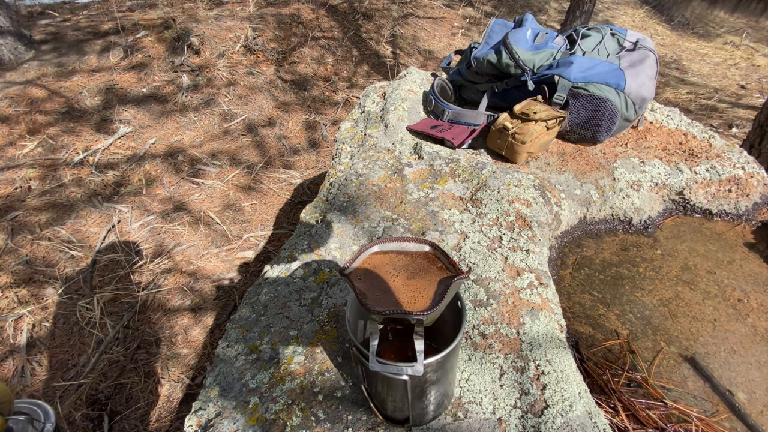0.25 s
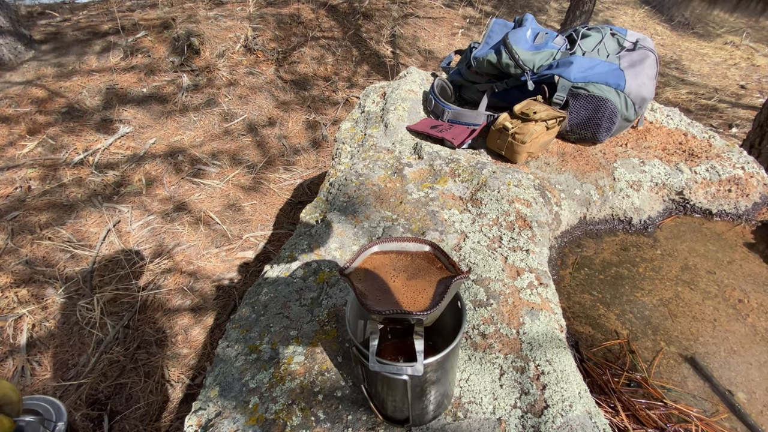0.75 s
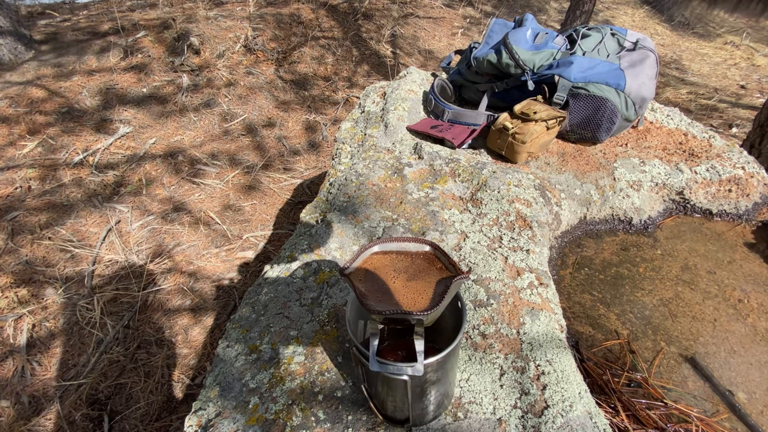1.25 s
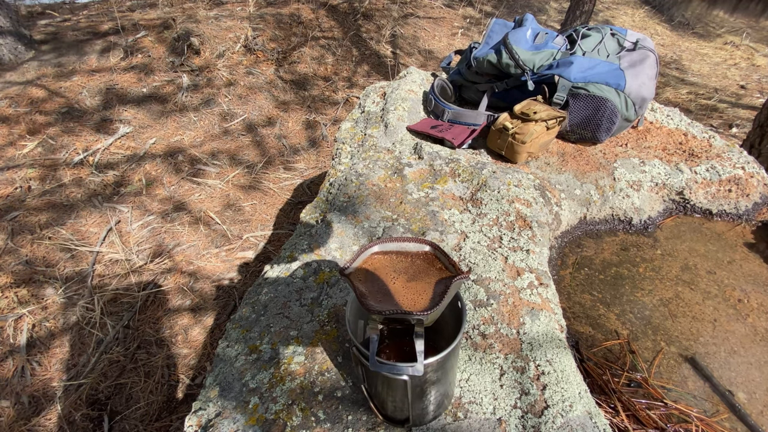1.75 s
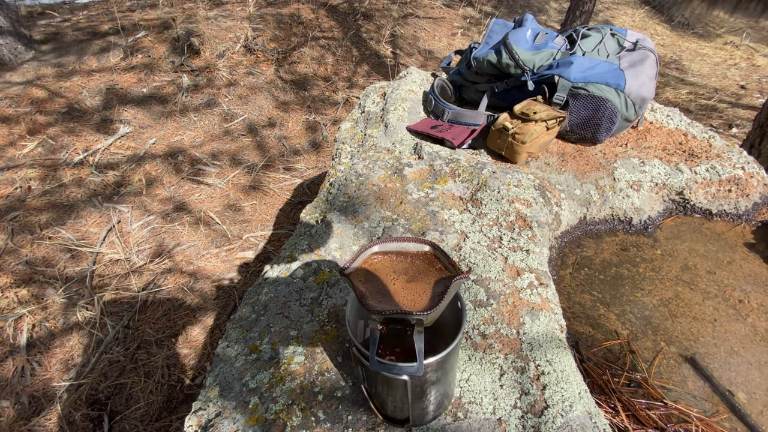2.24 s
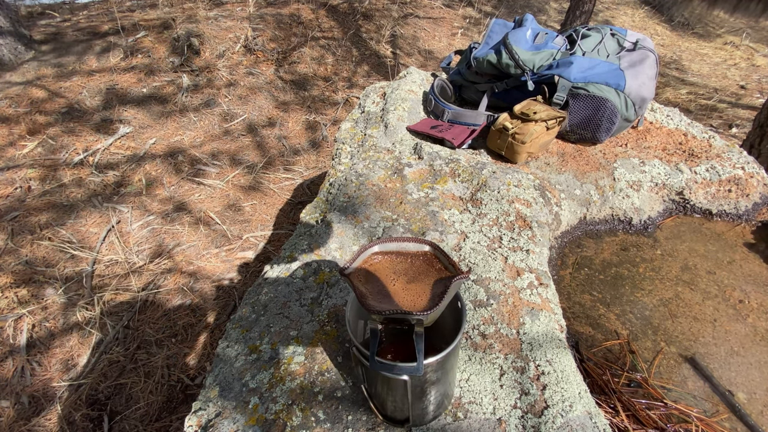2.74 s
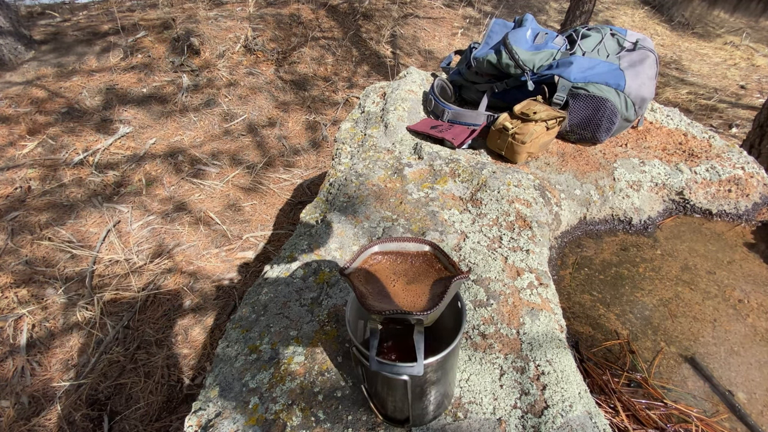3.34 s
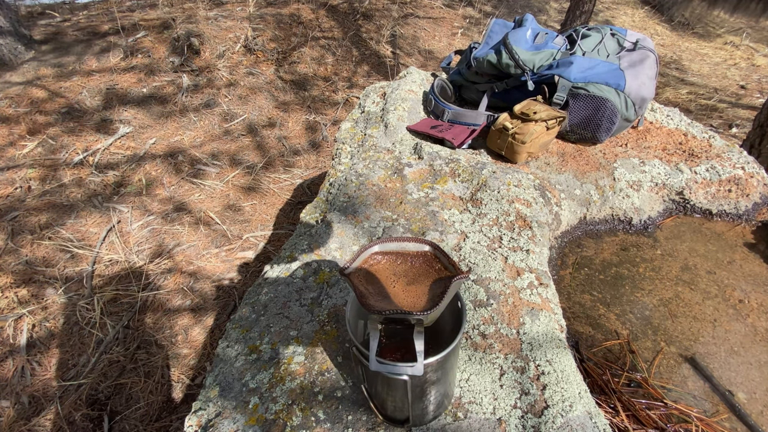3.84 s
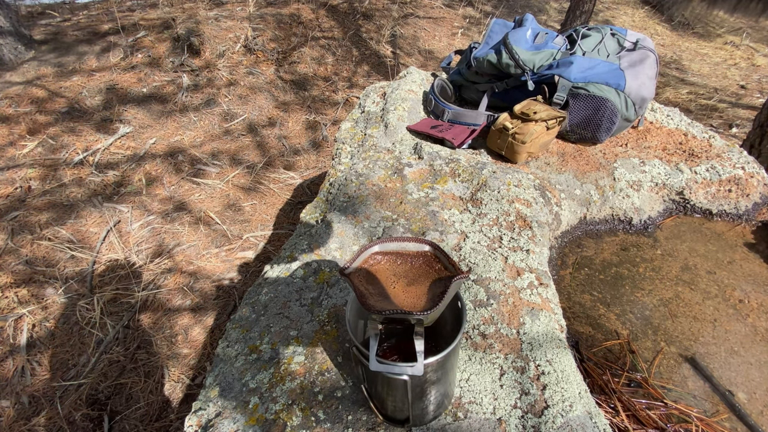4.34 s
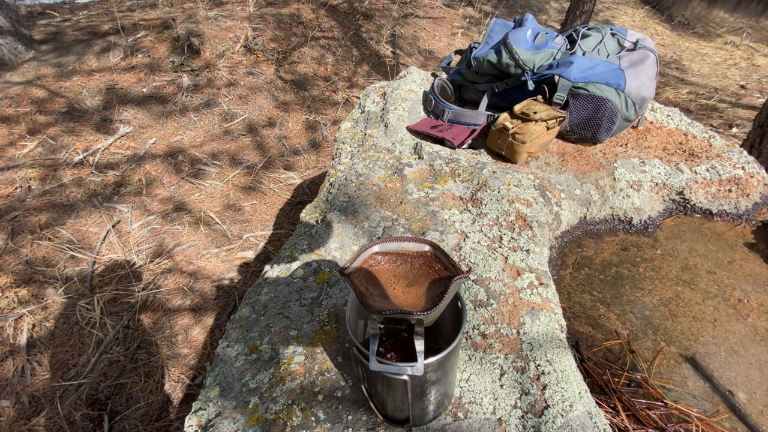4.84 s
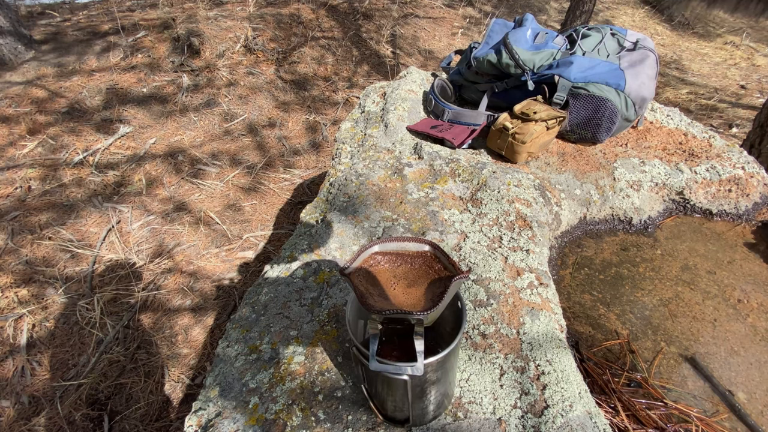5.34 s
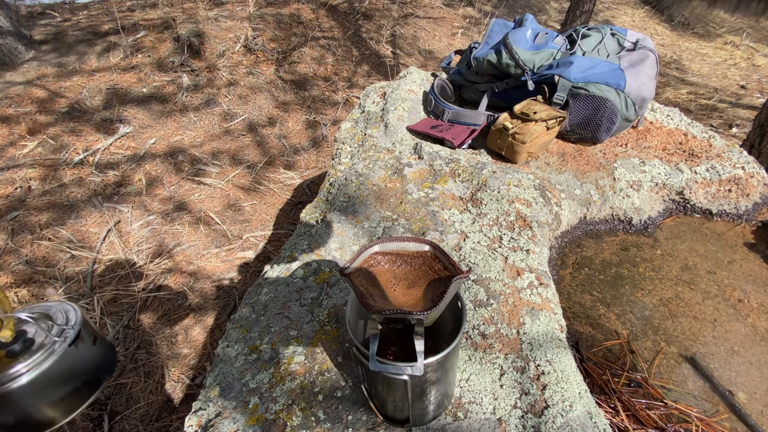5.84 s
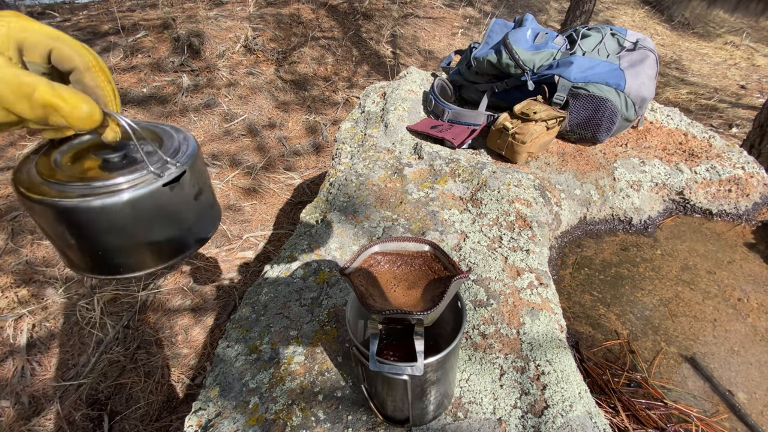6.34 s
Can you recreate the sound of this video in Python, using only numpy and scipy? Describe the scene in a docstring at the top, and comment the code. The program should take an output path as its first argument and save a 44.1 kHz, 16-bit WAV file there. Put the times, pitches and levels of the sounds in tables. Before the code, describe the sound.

Coffee drips from a wet filter into a steel cup, heard close up in open woodland. From 0 s, quick irregular plinks and smaller spattering droplets ring the metal briefly, while tiny high ticks and a fine crackle come from the wet grounds. Deep wind gusts buffet the microphone in uneven thumps until about 2.2 s. The wind then lulls, leaving the drops clear over a faint rush of trees and a weak, wavering engine hum far away. Around 4 s a second gust builds, strongest near 4.9 s, with fluttering puffs until about 5.6 s, then subsides, apart from a small low bump near 6.3 s. The dripping continues to the end at about 6.6 s, the small trickle and crackle slightly sparser and the cup's tones mostly a little lower as it fills.

```python
"""Coffee drips from a wet filter into a steel cup that stands on a rock in open woodland.
From the start a gust rumbles on the microphone, over a faint rush of trees and a far engine drone.
Drops plink all along and ring the cup, whose tones sink as it fills; bubbles in the wet grounds tick.
The wind lulls after two seconds and a second long gust follows after about four. Wind and trees are
shaped noise, the engine is one wavering tone, and drops and ticks are built from short bubble tones."""
import sys
import numpy as np
from scipy import signal
from scipy.fft import rfft, irfft
from scipy.io import wavfile

SR = 44100
rng = np.random.default_rng(int(sys.argv[2]) if len(sys.argv) > 2 else 0)


def to_wav(s):
    """Save 16-bit WAV."""
    ch = np.atleast_2d(s).T  # columns
    pcm = np.round(np.clip(ch, -1, 1) * 32767)  # PCM
    wavfile.write(sys.argv[1], SR, pcm.astype(np.int16))


N = 290178
TIME = np.arange(N) / SR
GUST_DB = -30  # wind force of a typical gust
EDGE_HZ = 15850  # upper edge of the recorder's band

# force of the wind on the microphone, two long gusts with a lull between: start_s, force_db
WIND_FORCE = [(0.08, -40), (.42, -41), (.62, -25.5), (.88, -41.5), (1.03, -35.5), (1.18, -28), (1.3, -26.5),
              (1.44, -31.5), (1.56, -33), (1.85, -33), (1.96, -29.5), (2.22, -58), (2.32, -47), (2.5, -61),
              (2.8, -62), (3.3, -56), (3.87, -48), (4.08, -41.5), (4.56, -34.5), (4.85, -25.5), (5.03, -31),
              (5.18, -35), (5.63, -44.5), (5.74, -54), (6.1, -62), (6.32, -38.5), (6.45, -50.5)]
# single puffs that hit the microphone inside the gusts: middle_s, half_length_s, extra_force_db
PUFFS = [(0.15, 0.069, 16), (0.42, 0.035, 11), (0.562, 0.032, 2.5), (1.409, 0.12, 15), (1.67, 0.015, -1),
         (1.78, 0.027, 14), (1.962, .015, 5), (4.049, 0.015, 20), (4.368, 0.065, 13), (4.731, .025, 9.5),
         (4.905, 0.04, 8.5), (5.232, .015, 13), (5.508, 0.032, 17)]
# slow swings of air pressure, which start before a gust and outlast it: start_s, level_db
SWAY_LEVEL = [(0, -0.5), (.9, -10.5), (1.7, -3), (2.2, -9), (2.6, -27), (3.2, -11.5), (3.7, -29.5),
              (4.3, -8.5), (4.85, -3.5), (5.6, -8.5), (5.9, -21), (6.58, -22)]
# noise spectra of the wind, from the slow swings to the smallest eddies; only the shape counts:
# pitch_hz, strength_db (per Hz)
SWAY_SPECTRUM = [(.3, -31), (1.2, 8), (3, 6), (5.5, -5.5), (8, -3), (13, -13.5), (19, -8), (26, -73.5),
                 (200, -170)]
BUFFET_SPECTRUM = [(10, -54), (18, -27), (25, 7.5), (35, -6), (50, -10), (70, -26), (120, -54.5),
                   (900, -150)]
FLUTTER_SPECTRUM = [(35, -30.5), (55, -13), (70, 1), (90, -6.5), (130, -15), (190, -37.5), (280, -29),
                    (600, -67.5), (4000, -130)]
EDDY_SPECTRUM = [(60, -22.5), (120, 4), (175, 2), (230, -9), (350, -22), (700, -57.5), (4000, -120)]
# noise spectrum of the air in the trees; only the shape counts: pitch_hz, strength_db (per Hz)
TREE_SPECTRUM = [(30, 3.5), (120, 7), (200, 0.5), (350, -1), (600, 3), (850, -1.5), (1150, -2.5),
                 (1600, -10.5), (2400, -14.5), (3400, -21.5), (5000, -30.5), (9000, -34.5), (15500, -37.5)]
# the far engine, before its waver: start_s, pitch_hz, level_db
ENGINE = [(0, 80, -69), (2, 88.3, -60.5), (2.5, 89.2, -59.5), (3.7, 92.4, -55.5), (4.2, 95.5, -53),
          (5.4, 98.8, -58.5), (6.58, 99.4, -56.5)]
# the clearest drops landing in the cup, before cup and rim act on them:
# start_s, level_db, bubble_pitch_hz, swell_cycles (to the bubble's peak), cup_answer_db (before a shared boost)
DRIPS = [(.0226, -51, 1310, 0.43, -17), (0.0553, -52, 2760, 0.55, 3), (0.0982, -57.5, 1940, 0.14, 14),
         (0.1364, -53, 3020, 0.67, 13), (0.155, -55, 2780, 1.5, -3), (0.1682, -43.5, 3160, 0.62, -9),
         (0.3666, -56, 2300, 0.18, 6), (0.417, -66, 2100, 0.46, 23), (0.4423, -41, 2380, 1.1, 0),
         (0.4573, -49.5, 1640, 0.36, 5), (.539, -54.5, 1530, 0.34, 12.5), (0.604, -59, 1450, 0.25, 17),
         (.653, -61, 2780, 0.22, 7),  (.72, -58, 3060, 1.5, 13), (0.7272, -45.5, 2710, 1.2, -21),
         (0.82, -54, 2500, 0.65, -5), (0.8334, -52.5, 2010, 0.13, -1), (0.841, -54.5, 1720, 0.074, 5),
         (0.8819, -47.5, 2740, 2.2, -20), (0.9268, -59.5, 2870, 0.97, 13.5), (0.985, -59, 1790, 0.63, -1.5),
         (1.0292, -49, 3700, 3.3, 2.5), (1.05, -45.5, 2740, 0.76, 1), (1.1867, -46, 2000, 1.3, -13),
         (1.2094, -47, 1960, 0.44, 1.5), (1.2302, -50, 1430, 0.32, 12.5), (1.33, -54.5, 1720, 0.41, -3),
         (1.41, -53.5, 2500, 0.62, 1), (1.4965, -49, 2440, 0.63, 2), (1.557, -54, 2300, 0.66, 2),
         (1.5691, -48, 2500, 0.31, -9), (1.6247, -50, 2520, 0.73, 2.5), (1.9046, -43, 700, 0.15, 2),
         (1.932, -58, 2316, 0.16, 15.5), (2.0166, -52, 1990, 0.17, -1), (2.059, -53.5, 1730, 0.28, -3),
         (2.1751, -47.5, 960, 0.14, 10), (2.2088, -50.5, 1380, 0.15, 4), (2.245, -53.5, 1750, 0.52, 4),
         (2.3355, -44.5, 1600, 0.38, 6), (2.4562, -48.5, 1540, 0.31, 0), (2.707, -46, 2040, 0.41, 3),
         (2.7285, -54.5, 1580, 0.47, 14), (2.7695, -46, 2270, 1.1, -3), (2.812, -60, 2110, 0.33, 10),
         (2.8623, -46.5, 1780, 0.33, -2), (2.893, -52, 1700, 0.35, -8), (2.928, -50.5, 1410, 1, 1),
         (2.964, -57, 1680, 0.38, 7), (3.0401, -56, 3400, 0.24, 8), (3.05, -54.5, 1660, 1, 9),
         (3.2117, -51.5, 2420, 0.24, -2), (3.248, -53, 1352, 0.063, 10.5), (3.285, -57, 2000, 0.77, -6),
         (3.3145, -56, 3240, 0.28, 10.5), (3.4108, -42.5, 2340, 0.88, 10.5), (3.504, -60, 2704, 0.33, 5),
         (3.557, -55, 1550, 0.28, 5), (3.7323, -42.5, 618, 1.26, -18), (3.886, -72, 2600, 0.34, 15),
         (3.916, -60.5, 1870, 0.47, 6), (4.0474, -47.5, 1150, 0.19, 1), (4.0801, -54, 2140, 0.24, 1),
         (4.1066, -61, 2380, 0.15, 15), (4.302, -52, 1040, 0.16, 9.5), (4.313, -47, 1274, 0.053, -1.5),
         (4.4608, -51, 1850, 0.39, 5.5), (4.586, -53.5, 2450, 0.5, 0), (4.6116, -45, 1760, 0.49, 2),
         (4.648, -49, 1940, 2.7, 1), (4.7677, -58, 1360, 0.39, 12), (4.8932, -55, 2230, 0.12, 3),
         (4.912, -49.5, 2000, 1.1, -14), (4.974, -59.5, 1520, 0.35, 11), (5.0643, -57.5, 895, 0.07, 16),
         (5.1, -59, 1990, 0.39, 11.5), (5.2215, -48, 2100, 1.1, 12), (5.249, -56.5, 1625, 0.49, 10),
         (5.292, -61.5, 3620, 0.35, -11), (5.3431, -46.5, 1900, 0.38, 3), (5.3708, -52, 1190, 0.16, 9.5),
         (5.401, -69, 1860, 0.52, 19), (5.444, -60, 1200, 0.15, 15.5), (5.5, -57, 2020, 0.11, 4.5),
         (5.636, -62, 1580, 0.36, -2), (5.7012, -42, 1626, 0.32, -0.5), (5.8052, -50.5, 3500, 0.54, -6),
         (5.828, -52, 2240, 1.6, -8), (5.846, -57.5, 2270, 1.2, -2), (5.996, -60.5, 2400, 0.3, 5),
         (6.057, -43, 1915, 0.61, -7), (6.113, -49.5, 2400, 0.078, -4.5), (6.176, -58, 1870, 2, 2.5),
         (6.257, -50.5, 1540, 0.2, 2), (6.421, -49.5, 2230, 0.36, 1.5)]
# the cup's own tones, before small random shifts:
# first_pitch_hz, fuller_pitch_hz, first_gain_db, fuller_gain_db, t60_s (time to fade by 60 dB)
CUP_TONES = [(590, 610, -3, -4, .06), (1270, 1085, 0, 2.5, .15), (1530, 1518, 3, -2, .09),
             (1890, 1750, -2, -6, .11), (2110, 1985, -2, 3, .1), (2350, 2330, -8, 13.5, .15),
             (2740, 2475, 11, 8, .15), (3560, 3320, 0, 6, .27), (3860, 3695, 10.5, 10.5, .18),
             (4820, 4340, 4, 6, .12), (5660, 5450, 3, 3, .1), (6120, 6200, 3, 3, .1),
             (7110, 6880, 3, 3, .1), (8170, 8380, 3, 3, .08)]
# what carries over the rim to the microphone: pitch_hz, gain_db
RIM = [(200, -22), (420, -13), (620, 4), (900, 1), (1500, 0.5), (2600, -1.5), (3250, -1.5), (3580, -3),
       (3800, -0.5), (4500, 0.5), (5000, -11.5), (9000, 1), (16000, -24)]
# the clearest bubbles bursting in the wet grounds, before a shared trim: start_s, level_db, pitch_hz
TICKS = [(.0553, -61, 5400), (0.0994, -57, 6670), (0.1105, -51.5, 6350), (0.1365, -52, 5870),
         (0.259, -60.5, 7640), (0.364, -63, 6500), (0.397, -50, 8500), (.612, -64, 6400),
         (0.726, -54, 7460), (0.835, -57, 6800), (0.844, -56, 5970), (0.928, -47.5, 9550),
         (0.9764, -57, 6860), (1.027, -49.5, 7100), (1.3602, -59.5, 6850), (1.49, -54, 6240),
         (1.667, -60, 6030), (1.747, -49, 6500), (1.779, -58, 6200), (1.8197, -51, 8300),
         (1.934, -53, 6800), (1.98, -53.5, 7760), (2.1297, -54, 7770), (2.388, -54.5, 6000),
         (2.6365, -58, 9800), (2.7948, -56, 7000), (3.0394, -58, 6500), (3.411, -59.5, 6100),
         (3.591, -56.5, 8000), (3.92, -60, 6360), (3.9522, -56.5, 7700), (4.0398, -49.5, 9600),
         (4.083, -58.5, 5900), (4.157, -62, 7500), (4.461, -55.5, 5960), (4.884, -53, 6700),
         (5.064, -54.5, 6400), (5.222, -54, 5570), (5.2904, -55, 6200), (5.3757, -58.5, 5470),
         (5.727, -48.5, 8700), (6.102, -53, 8100), (6.277, -61, 8800)]


def amp(db):
    """Turns decibels into gain."""
    return 10 ** (np.asarray(db) / 20)


def unit(x):
    """Scales a sound to rms 1."""
    return x / np.sqrt(np.mean(x ** 2) + 1e-30)


def curve(rows, axis=1):
    """Reads one column of a time table at every sample."""
    rows = np.asarray(rows, float)
    return np.interp(TIME, rows[:, 0], rows[:, axis])


def gain_at(points, hz):
    """Reads the gain from a pitch_hz, db table, with pitch on a log axis."""
    table_hz, db = np.transpose(points)
    return amp(np.interp(np.log(hz + 0.0011), np.log(table_hz), db))


def add(mix, s, sound):
    """Mixes a sound in at time s."""
    part = mix[max(round(s * SR), 0):][:len(sound)]
    part += sound[:len(part)]


def noise(points):
    """Makes noise of rms 1 with the given spectrum."""
    hz = np.fft.rfftfreq(N, 1 / SR)
    white = rfft(rng.standard_normal(N))
    return unit(irfft(white * gain_at(points, hz), N))


def wander(rate_hz):
    """Makes a smooth random curve of rms 1 that holds little motion faster than the rate."""
    hz = np.fft.rfftfreq(N, 1 / SR)
    keep_slow = np.exp(-(hz / rate_hz) ** 2) * (hz > 0)
    return unit(irfft(rfft(rng.standard_normal(N)) * keep_slow, N))


def blown(spectrum, force_db, gust_db, growth):
    """Turbulence: noise at gust_db in a typical gust, gaining growth dB for each dB of wind force."""
    return amp(gust_db + growth * (force_db - GUST_DB)) * noise(spectrum)


def wind(lumpy_db=2.0, lumps_hz=16, puff_share=0.37):
    """Big eddies sway the pressure; smaller ones buffet and flutter, the smallest only in gusts."""
    sway_limit = .75  # strong swings are rounded off towards this value
    swings = amp(curve(SWAY_LEVEL)) * noise(SWAY_SPECTRUM)
    sway = sway_limit * np.tanh(swings / sway_limit)
    force_db = curve(WIND_FORCE)
    puffs_db = sum(db * np.exp(-((TIME - s) / half_s) ** 2) for s, half_s, db in PUFFS)
    lumps_db = force_db + puffs_db + lumpy_db * wander(lumps_hz)
    buffet = blown(BUFFET_SPECTRUM, force_db + puff_share * puffs_db, gust_db=-25.5, growth=1.08)
    flutter = blown(FLUTTER_SPECTRUM, lumps_db, gust_db=-47.5, growth=0.56)
    eddies = blown(EDDY_SPECTRUM, lumps_db, gust_db=-64.0, growth=1.15)
    return sway + buffet + flutter + eddies


def trees(level_db=-56, swell_db=1.3, with_wind=0.021):
    """Air rushes in the trees as shaped noise that swells slowly, a little louder in the gusts."""
    gust_db = with_wind * (curve(WIND_FORCE) - GUST_DB)
    return amp(level_db + gust_db + swell_db * wander(0.31)) * noise(TREE_SPECTRUM)


def engine(waver=0.027, unsteady_db=2.9):
    """An engine far away hums one tone that creeps up while its pitch and level waver."""
    hz = curve(ENGINE, axis=1) * (1 + waver * wander(23))
    turns = np.cumsum(hz) / SR
    level_db = curve(ENGINE, axis=2) + unsteady_db * wander(13.0)
    return amp(level_db) * np.sin(2 * np.pi * turns)


def bubble(hz, cycles, rise_per_s=14, size=1500):
    """A pocket of air swells for some cycles, then fades, gliding up as it nears the surface."""
    t = np.arange(size) / SR
    turns = hz * t * (1 + rise_per_s * t / 2)
    age = turns / max(cycles, .1)
    return age * np.exp(-age) * np.sin(2 * np.pi * turns)


def froth(hz, cycles, octaves, spread_s, count, size=3000):
    """A handful of bubbles around one pitch, at scattered times, the late ones weaker; energy 1."""
    out = np.zeros(size)
    delays = spread_s * rng.exponential(1, count)
    tones, depths = rng.uniform(-0.927, 1, (2, count))
    for late, tone, depth in zip(delays, tones, depths):
        one = bubble(hz * 2 ** (octaves * tone / 2), cycles * 2 ** depth)
        add(out, late, np.exp(-late / spread_s / 2) * one)
    return out / (np.linalg.norm(out) + 1e-20)


def at_level(x, db, order=176):
    """Sets the rms level of a sound's first samples, about four milliseconds by default."""
    return amp(db) * x / np.sqrt(np.mean(x[:order] ** 2) + 1e-30)


def scatter(t60, delay, size=4000):
    """Dense fading reflections of energy 1 that start after a delay in seconds."""
    t = np.arange(size) / SR
    taps = rng.standard_normal(size) * amp(-60 * t / t60) * (t > delay)
    return taps / np.linalg.norm(taps)


def cup_ring(s, spot_db=2.0, slosh=0.0054, twin=0.5, split=0.0051, size=8000):
    """The cup's tones at time s, in close pairs: rising coffee retunes them, fast at first.

    Each landing spot favours some of the tones."""
    first_hz, last_hz, first_db, last_db, t60 = np.transpose(CUP_TONES)[:, :, None]
    spot, tilt = rng.standard_normal((2, *t60.shape))
    fill = np.sqrt(max(s, 0) * SR / N)  # 0 at the start, 1 at the end
    hz = (first_hz + (last_hz - first_hz) * fill) * (1 + slosh * tilt)
    db = first_db + (last_db - first_db) * fill + spot_db * spot
    t = np.arange(size, dtype=np.float32) / SR
    damping = np.log(1000) / t60
    angle = np.float32(2 * np.pi * hz) * t
    fade = np.exp(np.float32(-damping) * t)
    # the weaker twin lies slightly lower, so the two beat
    pair = (np.cos(angle) + np.float32(twin) * np.cos(angle * np.float32(1 - split))) * fade
    return (amp(db) * 2 * damping / SR * pair).sum(0) / np.hypot(1, twin)


def drop(s, db, hz, cycles, answer_db, slap_db=-12, slap_s=0.0023, brightness=2.41,
         walls_db=-3, ring_db=1, froth_db=-7):
    """A soft slap, a bubble and its froth bounce between the walls and ring the cup."""
    plink = bubble(hz, cycles)
    age = np.arange(len(plink)) / SR / slap_s
    slap = age * np.exp(-age) * rng.standard_normal(len(plink))
    plink = plink + amp(slap_db) * abs(plink).max() * slap
    # a low-pass above the bubble's pitch keeps the slap soft
    soften = signal.butter(2, min(brightness * hz, SR / 3), fs=SR)
    plink = at_level(signal.lfilter(*soften, plink), db)
    foam = froth(1.042 * hz, cycles=1.94, octaves=0.88, spread_s=.007, count=4)
    splash = amp(froth_db) * np.linalg.norm(plink) * foam
    add(splash, 0, plink)
    cup = amp(answer_db + ring_db) * cup_ring(s)
    add(cup, 0, amp(walls_db + answer_db / 3) * scatter(t60=0.028, delay=0.0013))
    cup[0] += 1  # the direct path
    return signal.fftconvolve(splash, cup)


def drips():
    """The drops that stand out, each landing at its time in the table."""
    out = np.zeros(N)
    for row in DRIPS:
        add(out, row[0], drop(*row))
    return out


def draining(count, slowing):
    """Random times whose rate falls by the factor exp(-slowing) from start to end."""
    share = (np.arange(count) + rng.random(count)) / count
    return -np.log(1 - share * (1 - np.exp(-slowing))) / slowing * N / SR


def droplet(s, db, size, tone, depth, spread_db=5, pitch_hz=2450, sag_hz_per_s=70,
            octaves=1.35, small_db=3.5):
    """A tiny splashy drop: the higher, the smaller and fainter; plinks sink as the cup fills."""
    hz = (pitch_hz - sag_hz_per_s * s) * 2 ** (octaves * tone / 2)
    level_db = db + spread_db * size - small_db * tone
    return drop(s, level_db, hz, cycles=0.85 * 2 ** depth, answer_db=-1.5,
                ring_db=5, slap_db=-19.5, froth_db=-5.5)


def spatter(rebound_db=-63, lag_s=0.012, weaker_db=16.0, trickle_db=-64, fading_db_per_s=0.3,
            slowing=1.3, count=290):
    """Two droplets fall back after each drip; others trickle, fewer and fainter as the filter drains."""
    out = np.zeros(N)
    chances = 2 * rng.random((len(DRIPS), 2, 4)) - 1  # from -1 to 1
    for row, pair in zip(DRIPS, chances):
        s = row[0]
        for k, (lag, *chance) in enumerate(pair):
            s += lag_s * 2 ** lag
            db = rebound_db - k * weaker_db - fading_db_per_s * s
            add(out, s, droplet(s, db, *chance))
    for s, chance in zip(draining(count, slowing), 2 * rng.random((count, 3)) - 1):
        add(out, s, droplet(s, trickle_db - fading_db_per_s * s, *chance))
    return out


def colour(x, points, size=2048):
    """Filters to the given spectrum without sounding ahead of time, so attacks stay sharp."""
    log_gain = np.log(gain_at(points, abs(np.fft.fftfreq(size, 1 / SR))))
    # minimum phase: the filter's energy comes as early as it can
    taps = np.fft.ifft(np.exp(np.conj(signal.hilbert(log_gain)))).real
    return signal.oaconvolve(x, taps[:size // 2])[:N]


def tick(s, db, hz, echo_db=-4, ring_db=3, snap_db=-8):
    """A film snaps and its neighbours fizz away in milliseconds; the filter echoes and the cup rings."""
    burst = froth(hz, cycles=1.0, octaves=1.48, spread_s=0.0016, count=7)
    snap = bubble(2.0 * hz, cycles=0.1)
    add(burst, 0, amp(snap_db) * snap / np.linalg.norm(snap))
    path = amp(ring_db) * cup_ring(s, slosh=0.017, size=4000)
    add(path, 0, amp(echo_db) * scatter(t60=0.084, delay=.0004))
    path[0] += 1  # the direct path
    return at_level(signal.fftconvolve(burst, path), db)


def grounds(burst_db=-4.0, fizz_db=-78, spread_db=6, largest=3, pitch_hz=6800, octaves=1.8,
            thinning_db=8, slowing=2.4, count=280):
    """Foam on the grounds ticks; a fine crackle between clear bursts thins as the water drains."""
    out = np.zeros(N)
    for s, db, hz in TICKS:
        add(out, s, tick(s, db + burst_db, hz))
    for s, (size, tone) in zip(draining(count, slowing), rng.random((count, 2))):
        louder_db = spread_db * min(-np.log(1 - size), largest)  # most are faint, a few louder
        db = fizz_db + louder_db - thinning_db * s * SR / N
        add(out, s, tick(s, db, pitch_hz * 2 ** (octaves * (tone - .5))))
    return out


def scene():
    """Wind and woodland surround the cup and filter close by."""
    around = wind() + trees() + engine()
    cup = colour(drips() + spatter(), RIM)
    return (around + cup + grounds())[None]


def record(dry):
    """The recorder's band limit: a steep low-pass, with the ends mirrored to avoid a jump."""
    taps = signal.firwin(401, EDGE_HZ, window=("kaiser", 9), fs=SR)
    padded = np.pad(dry, ((0, 0), (200, 200)), "reflect", reflect_type="odd")
    return signal.oaconvolve(padded, taps[None], "valid", axes=1)


dry = scene()
out = record(dry)
to_wav(out)
```